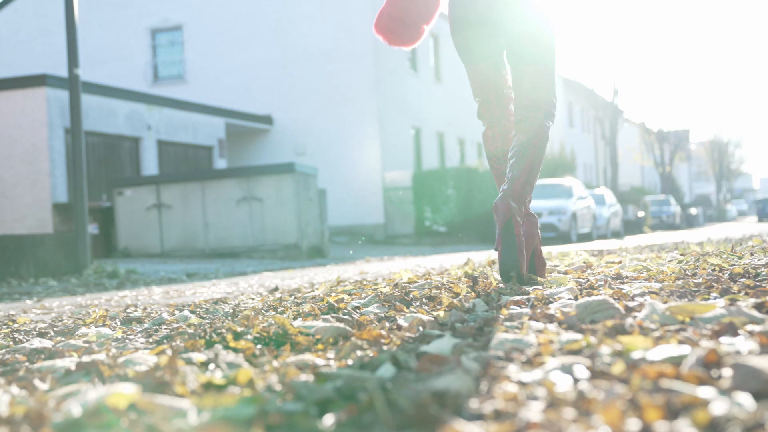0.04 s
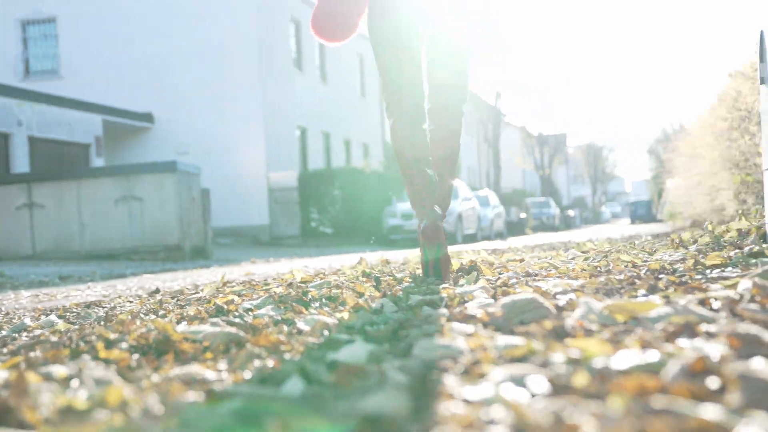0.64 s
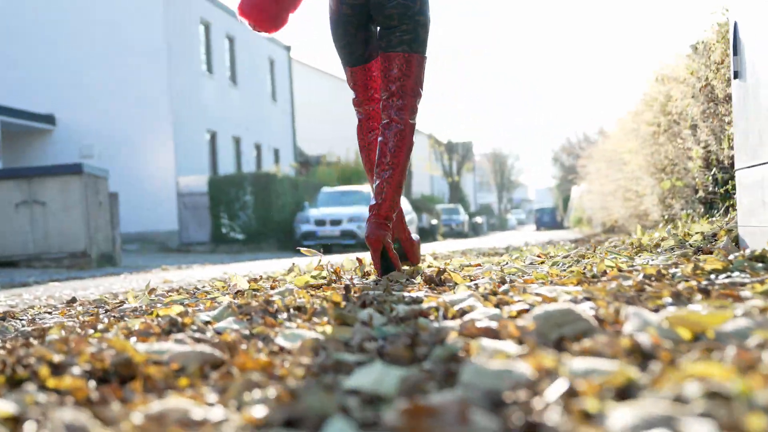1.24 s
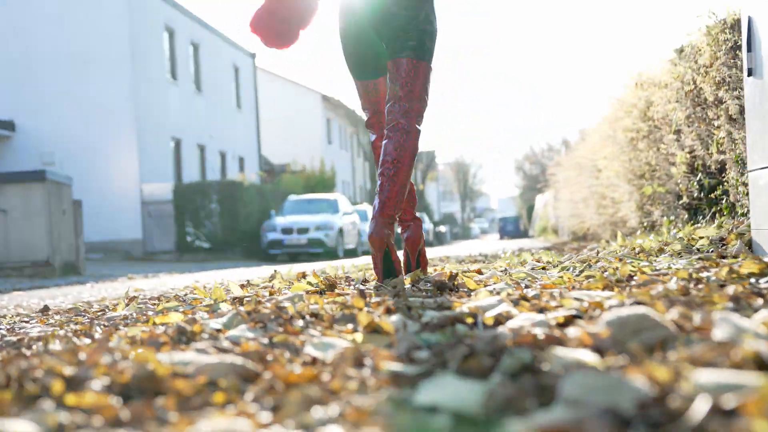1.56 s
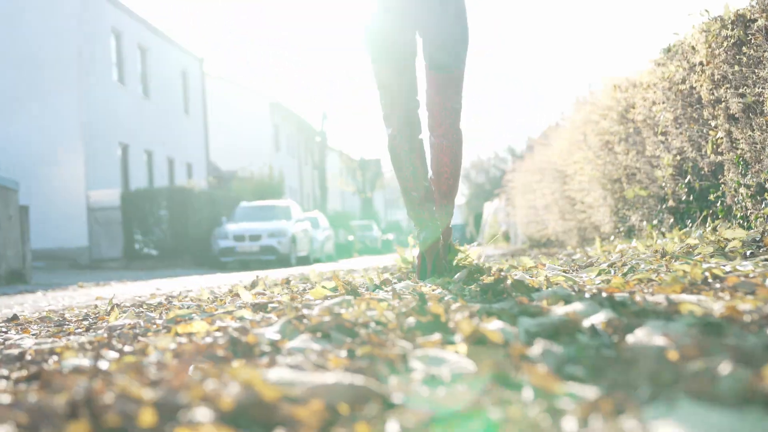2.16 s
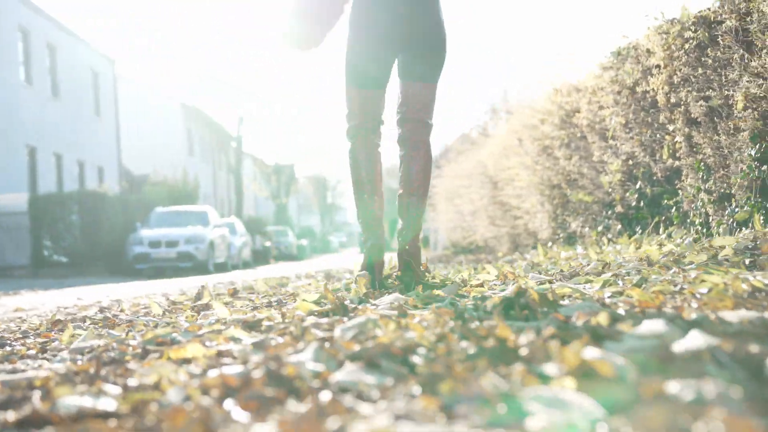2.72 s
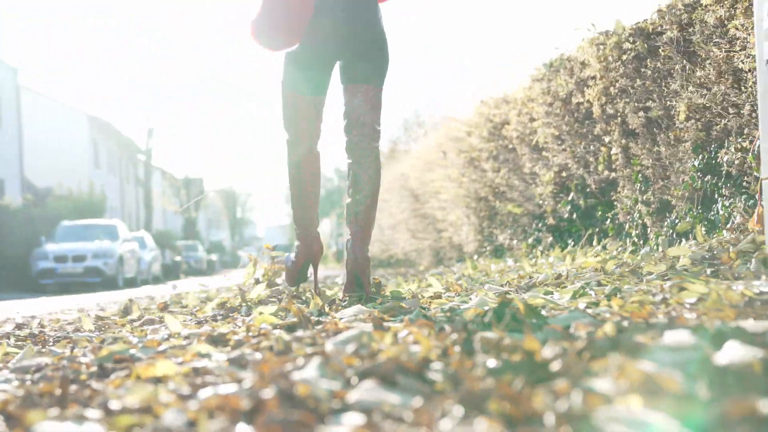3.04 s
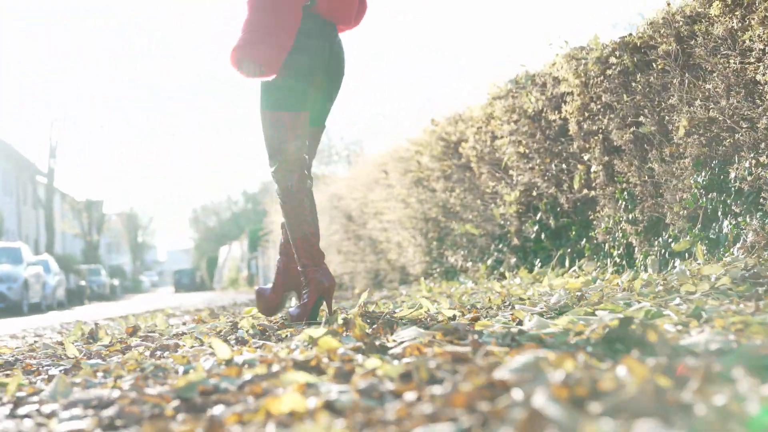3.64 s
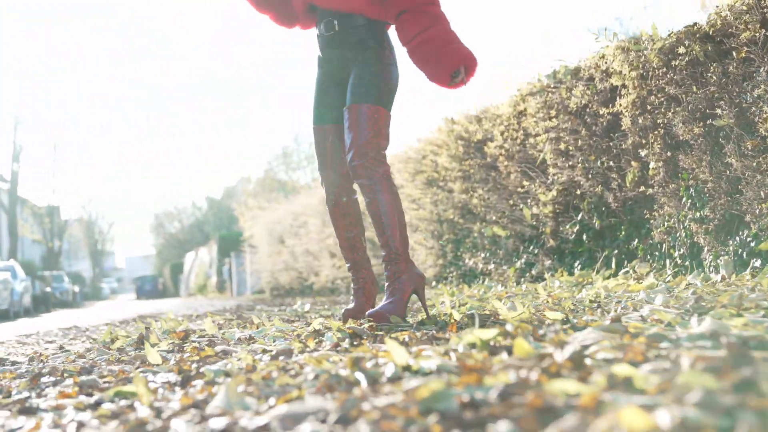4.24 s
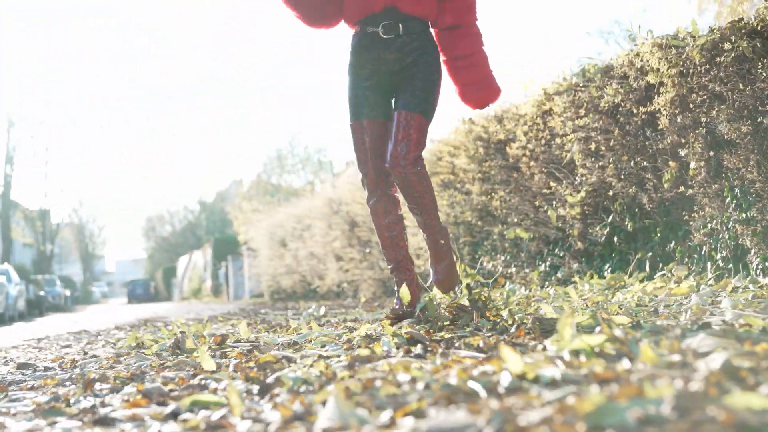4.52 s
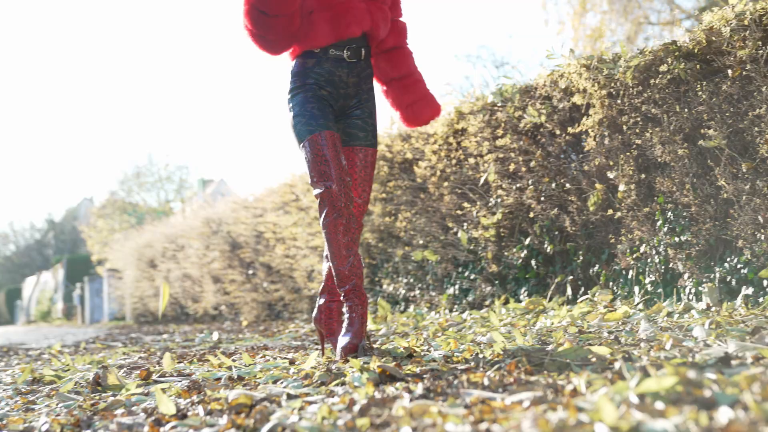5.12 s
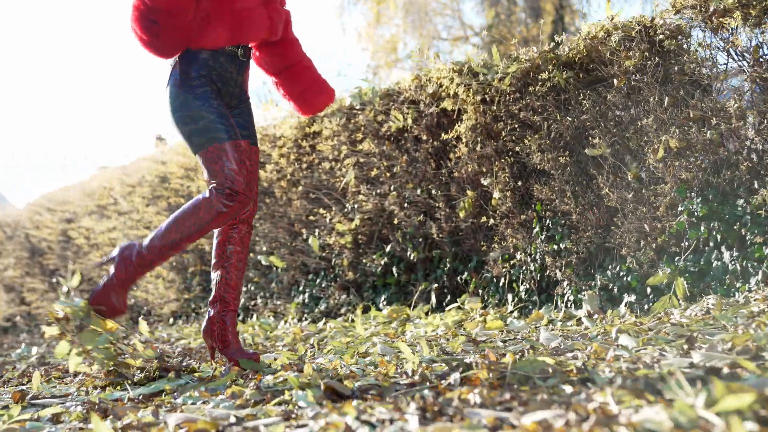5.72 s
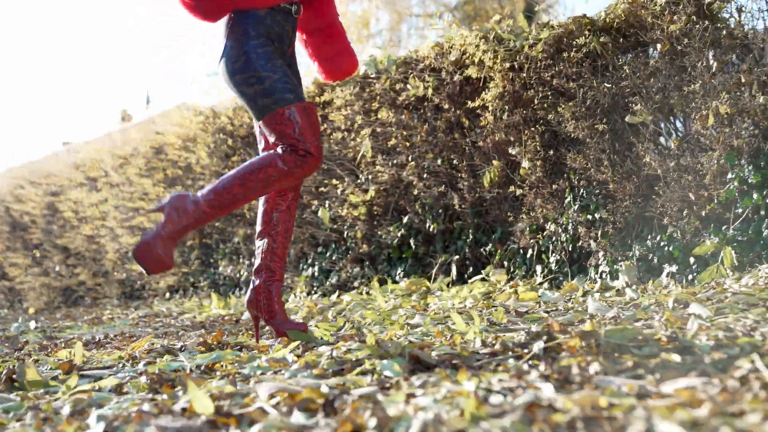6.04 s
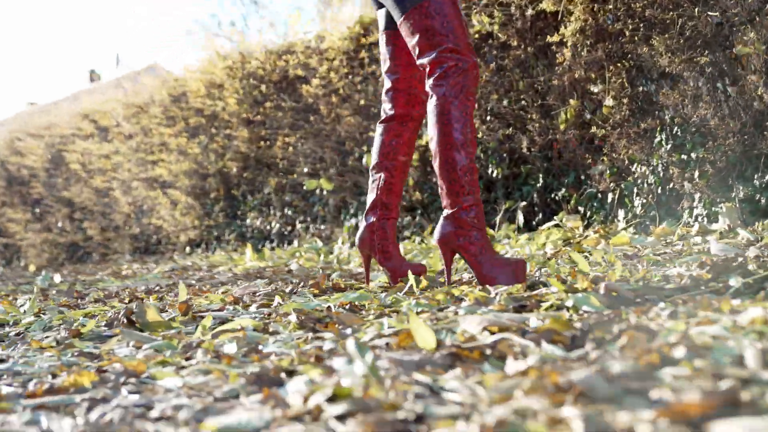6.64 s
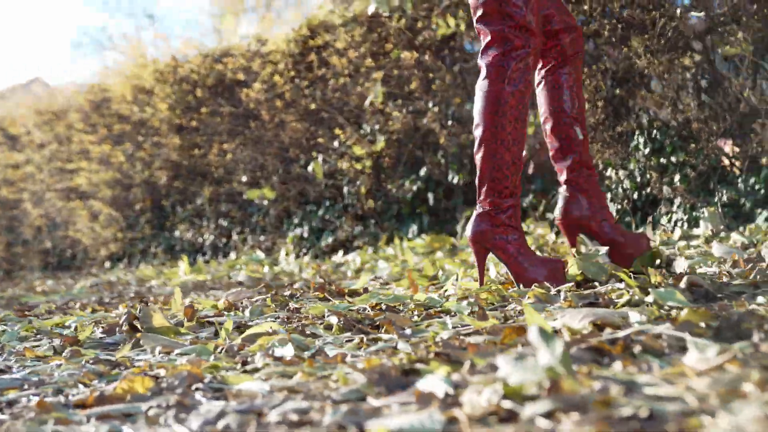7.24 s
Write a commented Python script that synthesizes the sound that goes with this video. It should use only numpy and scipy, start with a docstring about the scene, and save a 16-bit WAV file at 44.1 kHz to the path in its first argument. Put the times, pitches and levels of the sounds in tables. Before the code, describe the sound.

High-heeled boots walk through dry leaves on a pavement, close to a microphone near the ground. The crisp crunching is almost continuous, with sharp stalk snaps, dull sole scuffs and a few soft heel thuds. It starts slightly left, then moves in front and thins to a lighter crackle. Wind buffets the microphone at the start, drops away, and returns stronger in the second half. Distant traffic hums faintly along a residential street.

```python
"""Dry leaves crunch under high-heeled boots on a pavement, close to a microphone near the ground.
Each step or kick breaks a swarm of leaf blades; stalks snap, soles grind, heels thud through the litter.
The boots start on the left and cross in front. Gusts buffet the two microphone ports,
over the faint hum of a residential street."""
import sys
import numpy as np
from scipy import signal
from scipy.fft import rfft, irfft
from scipy.io import wavfile
from scipy.ndimage import uniform_filter1d

SR = 44100
rng = np.random.default_rng(int(sys.argv[2]) if len(sys.argv) > 2 else 0)


def transcribe(u):
    """Save the signal u as a 16-bit wav file named by the first command-line argument.

    u: samples, shape (n,) or (channels, n), limited to [-1, 1]; the rate is SR.
    q: integer samples, one column per channel.
    """
    v = np.clip(np.atleast_2d(u).T, -1, 1)
    q = np.round(v * 32767).astype(np.int16)
    wavfile.write(sys.argv[1], SR, q)


N = 320607
TIME_S = np.arange(N) / SR
FREQ_HZ = np.fft.rfftfreq(N, 1 / SR)
GRID_S = np.arange(0, N / SR, .001)

# treads, kicks, drags: t/s, attack/s, length/s, level/dB, body gain/dB, splinter gain/dB, leaf ring/Hz
STEPS = [(0.029, .025, .05, -35.5, -7.5, 6, 7800), (0.085, .06, 0.103, -30.5, -7.5, 4, 7500),
         (0.205, 0.0335, .115, -34.5, -6.5, 2.5, 6700), (0.515, 0.027, 0.11, -41, -8.5, 1, 5700),
         (0.604, 0.046, .18, -27.5, -9.5, 2, 5386), (0.765, .06, .175, -29, -7.5, 2.5, 5326),
         (0.945, .06, .175, -30, -8.5, 3, 6300), (1.117, 0.025, 0.082, -35, -4.5, 4, 6370),
         (1.197, 0.0205, .065, -27, -8, 2, 6500), (1.29, 0.02124, .075, -30, -8.5, 2.5, 6730),
         (1.375, 0.0186, .055, -36, -1, 1, 5800), (1.434, .01, .21, -26.5, -8.5, 0, 4720),
         (1.635, .04, .215, -32.5, -8, 3, 5740), (1.887, 0.0307, .15, -30.5, -9, 5, 7970),
         (2.031, 0.063, .3, -26.5, -9, 3, 6050), (2.335, 0.0321, .115, -33, -6.5, 9, 6320),
         (2.48, 0.048, .105, -31, -10, 3.5, 6610), (2.581, 0.075, .2, -32.5, -6.5, 5, 7420),
         (2.793, 0.01614, .06, -25.5, -13, -.5, 7180), (2.9, 0.0229, 0.0875, -33.5, -8.5, 3.5, 6670),
         (3.004, 0.078, .1, -26, -10.5, 0.5, 6290), (3.115, .03, .155, -32.5, -7.5, 5.5, 6365),
         (3.275, .03, .075, -35, -6.5, 2.5, 6710), (3.359, 0.0298, .32, -39.5, -6, 2.5, 6165),
         (3.688, 0.047, .115, -25.5, -8, 4, 6700), (3.79, .04, .085, -29.5, -7, 3.5, 6190),
         (3.88, 0.048, .165, -34.5, -7.5, 3, 5295), (3.995, 0.0095, 0.01815, -32, -4.5, -2, 5500),
         (4.04, 0.035, .095, -35, -7.5, 3.5, 7005), (4.135, .045, .075, -30, -5.5, 5, 7590),
         (4.263, 0.027, .085, -27.5, -4, 5, 7670), (4.345, 0.0252, .19, -26, -7, 3, 7000),
         (4.54, .03, .11, -33.5, -7, 2.5, 6450), (4.675, .03, .045, -32.5, -12.5, 3, 6800),
         (4.852, 0.056, .1, -33.5, -5.5, 6.5, 8300), (5.02, .07, .135, -28.5, -7, 2.5, 7060),
         (5.155, .035, .085, -25.5, -11.5, 0.5, 6180), (5.295, 0.0139, 0.0248, -33.5, -7.5, 3, 6250),
         (5.355, 0.023, .11, -39.5, -4.5, 5, 6500), (5.515, 0.054, .11, -35.5, -1, 8, 7300),
         (5.635, 0.011, .14, -39.5, -1, 8.5, 7450), (5.794, .014, .108, -28, -8.5, 6.5, 7700),
         (5.925, 0.023, .21, -40, -2.5, 8.5, 8060), (6.14, 0.1, .2, -38.5, -2, 8.5, 6760),
         (6.345, 0.027, 0.076, -48, 1, 11, 7100), (6.96, 0.054, .2, -44.5, -2, 8.5, 7400),
         (7.18, 0.0514, 0.079, -39.5, -5, 10.5, 8160)]
# leaves stirring on their own: level/dB, body gain/dB, splinter gain/dB, leaf ring/Hz
STIR = (-58, -5, 14.5, 6000)
# leaf colour at the ports: f/Hz, boots left/dB, boots ahead/dB
LEAF_SPECTRUM = [(80, -27, -20), (250, -8, -10), (710, -1.5, 0.5), (1060, 0, 1.5), (2100, -1.5, -4.5),
                 (2600, 5.5, -4.5), (3500, 3, -7.5), (3770, 3.5, -2), (6060, 0.5, 0), (7300, 1.5, 0),
                 (8800, 3, 0.5), (11300, 2, -7), (15500, 4, -4)]
# crunch position: t/s, left minus right/dB
CRUNCH_PAN = [(0.05, 4), (1.9, 4), (3.3, 3.5), (4.2, 2), (5.3, 4), (5.6, -1), (6.4, -0.5), (6.6, -9),
              (7.27, -2)]
# stalks and stiff leaves snapping: t/s, energy/dB, left minus right/dB
SNAPS = [(0.076, 0, 7), (0.2628, 5.5, 0), (0.3177, -16, 13), (0.325, -7, 6), (0.3326, -7, 9),
         (0.378, -2.5, 5), (0.4275, 0, 4), (0.436, 1, 2), (0.4437, -6, 2), (0.45, 2.5, 5), (0.4558, -5, 6),
         (0.4802, -3, 38), (0.488, -6, 9), (0.5317, -4, 9), (0.547, 0, 8), (0.5531, 2, 16), (0.5664, 0, 3),
         (0.5826, -0.5, 6), (0.622, 5, 18), (1.236, 5, -3), (1.886, 4, 6), (2.806, 6, 9), (3.3426, -4, 4),
         (3.6373, -5, 7), (3.649, -3, 14), (3.6768, 0.5, 10), (4.6927, 3.5, 34), (4.702, 8, 0),
         (4.784, -0.5, 4), (4.8401, 0, 4), (5.3829, -1, 7), (5.592, 2, -5), (5.7716, 0, -13),
         (5.8054, -6, -12), (6.063, 1, -12), (6.201, -7, 4.5), (6.388, -12, -9), (6.468, -10, -12),
         (6.855, -2, -6)]
# sole grinding leaves into the paving: t/s, level/dB, duration/s
SCUFFS = [(0.647, -37.5, 0.069), (1.312, -34.5, 0.059), (2.05, -34.5, 0.078), (2.221, -38.5, 0.099),
          (2.85, -34.5, 0.041), (3.757, -35, 0.031), (4.296, -32, 0.034), (4.394, -33, 0.1),
          (5.809, -37, .03)]
# heel and sole impacts: t/s, peak/dB
THUDS = [(2.307, -37), (2.531, -28.5), (2.651, -23), (2.85, -31), (3.139, -31)]
# port response to a source on the left: f/Hz, left lead/rad, coherence/0-1, left minus right/dB
PORT_RESPONSE = [(100.05, -1, 0.2, -17), (676, 1.1, 1, 7.5), (1190, 0, 0, 16), (2000, 3.5, 0.2, 3),
                 (3600, 3.5, 0.71, -3.5), (4740, 5.5, 0.2, -2.5), (6140, 4.5, 0.4, -1.5),
                 (7900, 8, 0.55, -2), (9200, 11, 0, -2), (10700, 7.5, 0.37, 0), (15400, 5, 0, 4)]
# gusts at the microphone: t/s, rise/s, length/s, level/dB
GUSTS = [(0.004, 0.018, 0.022, -26.5), (0.173, 0.038, 0.082, -23.5), (0.271, .02, 0.038, -27),
         (0.385, 0.026, 0.15, -26.5), (0.506, 0.041, 0.1, -26), (0.67, 0.02, 0.23, -27.5),
         (0.85, 0.076, .25, -25.5), (1.205, 0.028, .08, -33), (1.302, 0.035, 0.15, -33),
         (4.336, 0.041, 0.19, -33.5), (4.584, 0.063, 0.1, -24), (4.735, 0.029, 0.13, -28),
         (4.869, 0.038, 0.13, -26), (5.019, 0.024, 0.32, -24), (5.355, 0.029, 0.078, -27.5),
         (5.504, 0.022, 0.077, -30), (5.625, 0.062, 0.15, -36), (5.784, 0.027, .11, -30),
         (5.975, 0.043, .075, -22), (6.11, 0.028, 0.19, -28.5), (6.234, 0.054, 0.11, -21),
         (6.439, 0.016, 0.11, -22.5), (6.553, 0.038, 0.096, -19), (6.727, 0.053, 0.14, -19.5),
         (6.877, 0.042, 0.1, -22), (7.057, 0.024, 0.055, -25), (7.173, 0.043, 0.11, -18.5)]
# single eddies slapping the microphone: t/s, boost/dB
EDDY_SLAPS = [(0.226, 13), (0.409, 9), (0.949, 11.5), (4.674, 7), (4.921, 7), (5.129, 8), (5.323, 10),
              (6.046, 9.5), (6.449, 17), (6.595, 7.5), (6.623, 6), (6.797, 14), (7.081, 12)]
# choppiness of the air: t/s, small-eddy gain/dB
CHOP = [(0.3, -4.5), (1.2, -0.5), (4.6, 6.5), (5.3, 6), (6.0, -10.5), (6.6, 5), (7.2, -0.5)]
# eddies drifting from the windward port to the other: f/Hz, lag/rad, coherence/0-1
EDDY_DRIFT = [(20, .25, 0.1), (86, 0.37, 1), (170, 0.86, 0.75), (343, 1.45, 0.85), (640, 2, 0.71),
              (2000, 1.16, 0.95)]
# wind buffeting: f/Hz, level/dB
WIND_SPECTRUM = [(25, -9), (50, -3), (90, 4), (170, 3.5), (300, -3), (500, -10), (800, -21), (1200, -31),
                 (2000, -46), (3500, -78)]
# far traffic: f/Hz, level/dB
TRAFFIC_SPECTRUM = [(25, -15), (60, -3.5), (110, -10), (180, -10.5), (400, -16.5), (1000, -15.5),
                    (2000, -25.5), (6000, -21.5), (15000, -25.5)]

LIFT_S = 0.033  # the boot's weight lets go
SETTLE_DB, SETTLE_S = -17, .2  # disturbed leaves crackle on
UNEVEN_DB, UNEVEN_HZ = 0.8, 59.93  # the litter gives way in fits
GUST_FALL_S, LULL_DB, FLUTTER_DB = 0.072, -47.5, 2.3
TOP_HZ = 15800


def leaf_crunch(leftness):
    """Fractures over a rub of blade on blade, mixed as body, crisp and splinter bands."""
    step_db, body_db, splinter_db, ring_hz = step_curves()
    crunch_db = step_db + UNEVEN_DB * jitter(UNEVEN_HZ)
    swarm = fracture_swarm(crunch_db, ring_hz)
    rub = undb(2.5 + 1.1 * jitter(70)) * rng.standard_normal((2, N))
    sound = mic_ports(ground_echo(swarm + rub), leftness)
    left_db, ahead_db = per_bin(LEAF_SPECTRUM)
    sound = leftness * filtered(sound, undb(left_db)) + (1 - leftness) * filtered(sound, undb(ahead_db))
    below_crisp, below_splinters = lowpass(3500, order=12), lowpass(8500, order=12)
    body = unit_rms(filtered(sound, below_crisp)) * undb(body_db)
    crisp = unit_rms(filtered(sound, below_splinters - below_crisp)) * undb(-0.56)
    splinters = unit_rms(filtered(sound, (1 - below_splinters) * (FREQ_HZ < TOP_HZ)))
    bands = body + crisp + splinters * undb(splinter_db - 3)
    return bands * undb(crunch_db) * pan(per_sample(CRUNCH_PAN)[0])


def step_curves():
    """Steps add in energy and weight the colour by their share: level/dB, body/dB, splinters/dB, ring/Hz."""
    starts_s, attacks_s, lengths_s, level_db, *colours = np.transpose(STEPS)
    stir_db, *stir_colours = STIR
    press = envelopes(starts_s, lengths_s, attacks_s, LIFT_S)
    settle = undb(SETTLE_DB) * envelopes(starts_s, lengths_s, attacks_s, SETTLE_S)
    step_energy = undb(level_db)[:, None] ** 2 * (press ** 2 + settle ** 2)
    energy = np.vstack([step_energy, np.full(len(GRID_S), undb(stir_db) ** 2)])
    total = energy.sum(axis=0)
    colour = np.column_stack([colours, stir_colours]) @ energy / total
    return per_sample(np.column_stack([GRID_S, 10 * np.log10(total), *colour]))


def fracture_swarm(crunch_db, ring_hz, count=14000):
    """A harder step breaks more leaves; they share its weight, so the swarm is levelled."""
    when, luck, size, side = rng.random((count, 4)).T
    at_s = when * TIME_S[-1]
    break_chance = np.clip(undb(.9 * (crunch_db + 25)), .04, 1)
    breaks = luck < np.interp(at_s, TIME_S, break_chance)
    at_s, size, side = at_s[breaks], size[breaks], side[breaks]
    gains = undb(np.minimum(-4.5 * np.log(size), 9)) * pan(8 * (side - .5))
    grains = cracks(np.interp(at_s, TIME_S, ring_hz), ring_db=7, decay_s=0.00043, spread=0.26,
                    tail_db=-10.5, tail_s=0.011)
    swarm = place(at_s, grains * gains[..., None])
    power = uniform_filter1d(np.mean(swarm ** 2, axis=0), size=1800).clip(0)
    return swarm / np.sqrt(power + 1e-6)


def cracks(ring_hz, ring_db, decay_s, spread, tail_db, tail_s, samples=384):
    """Unit-energy brittle fractures: each rings its scrap of leaf and scatters in the litter."""
    t = np.arange(samples) / SR
    stretch, detune = rng.standard_normal((len(ring_hz), 2)).T[:, :, None]
    fracture = np.exp(-t / (decay_s * np.exp(spread * stretch)))
    scatter = undb(tail_db) * np.exp(-t / tail_s) * (1 - t / t[-1])
    burst = rng.standard_normal((2, len(ring_hz), samples)) * (fracture + scatter)
    ratio = (np.fft.rfftfreq(2 * samples, 1 / SR) + 1) / (ring_hz[:, None] * np.exp(.2 * detune))
    resonance = 1 + undb(ring_db) / (1 + 3j * (ratio - 1 / ratio))
    sound = irfft(rfft(burst, 2 * samples) * resonance)[..., :samples]
    energy = np.sum(sound ** 2, axis=-1, keepdims=True)
    return sound / np.sqrt(energy.mean(axis=0))


def stalk_snaps(leftness):
    """Stalks give way with a bright tick, fibres tearing for about 1 ms."""
    at_s, energy_db, pan_db = np.transpose(SNAPS)
    ticks = cracks(np.full(len(at_s), 5200.), ring_db=-1, decay_s=.0012, spread=.1,
                   tail_db=-28, tail_s=.004)
    sound = place(at_s, ticks * (undb(energy_db) * pan(pan_db))[..., None])
    return filtered(mic_ports(sound, leftness), 1 - .7 * lowpass(3500, order=6))


def sole_scuffs(leftness):
    """Crushed leaves slip in small, dull jerks between sole and paving."""
    press = sum(undb(db) * bump(at_s, length_s / 2) for at_s, db, length_s in SCUFFS)
    jerks = rng.standard_normal((2, N)) * undb(1.9 * jitter(300))
    band = lowpass(910, order=4) * (1 - lowpass(930, order=3))
    return press * unit_rms(filtered(mic_ports(jerks, leftness), band))


def heel_thuds(partials=30):
    """Heel and sole land on padded paving: a few low, quickly damped swings."""
    at_s, peak_db = np.transpose(THUDS)
    t = np.arange(SR // 8) / SR
    hz = 70 + 210 * rng.random((len(at_s), partials, 1))
    swing = np.sin(2 * np.pi * (hz * t + rng.random(hz.shape))).sum(axis=1)
    swing = swing * (1 - np.exp(-t / 0.0045)) * np.exp(-t / 0.014)
    swing = swing / np.abs(swing).max(axis=1, keepdims=True) * undb(peak_db)[:, None]
    return place(at_s, np.array([swing, swing]))


def ground_echo(x, lag_s=0.000583, wander=0.24, gain=0.32):
    """Early echo off boot and ground; its path wanders as the feet move, shifting the colour."""
    echo = [np.interp(TIME_S - lag_s * np.exp(wander * jitter(6)), TIME_S, side) for side in x]
    return x + gain * np.array(echo)


def mic_ports(x, leftness):
    """From the left, sound reaches the right port late and shaded; from ahead only bass is coherent."""
    lead_rad, coherence, shade_db = per_bin(PORT_RESPONSE)
    sideways = filtered(coherent_pair(x, np.clip(coherence, 0, .98), lead_rad), pan(shade_db))
    ahead = coherent_pair(x, lowpass(1260, order=2), lag_rad=0)
    return leftness * sideways + (1 - leftness) * ahead


def wind_buffet():
    """Eddies shake one port, then the other; strong gusts add small eddies that flutter higher up."""
    gust_db = gust_level_db()
    slap_db = sum(db * bump(at_s, 0.0027) for at_s, db in EDDY_SLAPS)
    push_db = gust_db + slap_db + 1.73 * jitter(45)
    lag_rad, coherence = per_bin(EDDY_DRIFT)
    air = coherent_pair(rng.standard_normal((2, N)), np.clip(coherence, 0, .995), lag_rad)
    veer_rad = np.interp(TIME_S, [1.6, 4.3], [0, np.pi / 2])  # from the right, later from the left
    air = np.cos(veer_rad) * air[::-1] + np.sin(veer_rad) * air
    air = filtered(air, undb(per_bin(WIND_SPECTRUM)[0]) * (1 - lowpass(25, order=4)))
    air = air / np.sqrt(uniform_filter1d(air.mean(axis=0) ** 2, size=1500))  # the gust sets the energy
    large = filtered(air, lowpass(244, order=4))
    medium = filtered(air, lowpass(300, order=4)) - large
    small = air - large - medium
    strength = np.clip(undb(.5 * (push_db + 21.5)), .2, 1)
    flutter = strength * medium + strength ** 2 * small * undb(FLUTTER_DB * jitter(110))
    lull_gain = 1 / (1 + undb(2 * (-50.5 - gust_db)))
    return (large + flutter * undb(per_sample(CHOP)[0])) * undb(push_db - 1.5) * lull_gain


def gust_level_db():
    """Gusts rise, hold and die away over a light breeze."""
    starts_s, rises_s, lengths_s, level_db = np.transpose(GUSTS)
    gusts = undb(level_db)[:, None] * envelopes(starts_s, lengths_s, rises_s, GUST_FALL_S)
    energy = np.sum(gusts ** 2, axis=0) + undb(LULL_DB) ** 2
    return np.interp(TIME_S, GRID_S, 10 * np.log10(energy))


def street_hum():
    """Far traffic murmurs evenly; a 110 Hz engine drone grows in it."""
    mid, side, engine = rng.standard_normal((3, N))
    noise = mid + np.array([[1], [-1]]) * filtered(side, 1 - 0.7 * lowpass(1100, order=2))
    traffic = unit_rms(filtered(noise, undb(per_bin(TRAFFIC_SPECTRUM)[0])))
    drone = unit_rms(filtered(engine, np.exp(-((FREQ_HZ - 110) / 4) ** 2)))
    drone_db = np.interp(TIME_S, [2.8, 3.6, 4.4, 6], [-59, -48.5, -47.5, -43])
    return traffic * undb(-41.5 + jitter(4) / 2) + drone * undb(drone_db)


def coherent_pair(x, coherence, lag_rad):
    """Left is x[0]; right blends a lagged copy of it with x[1]."""
    shared = filtered(x[0], coherence * np.exp(-1j * lag_rad))
    own = filtered(x[1], np.sqrt(1 - coherence ** 2))
    return np.array([x[0], shared + own])


def envelopes(starts_s, lengths_s, attacks_s, release_s):
    """Attack, hold, release on the 1 ms grid, one row an event."""
    t = GRID_S[:, None] - starts_s
    return (np.clip(t / attacks_s, 0, 1) * np.exp(-np.maximum(t - lengths_s, 0) / release_s)).T


def bump(at_s, half_width_s):
    """Gaussian pulse, peak 1."""
    return np.exp(-((TIME_S - at_s) / half_width_s) ** 2)


def jitter(rate_hz):
    """Smoothed random steps, spread 1."""
    hold = int(SR / rate_hz)
    stairs = np.repeat(rng.standard_normal(N // hold + 1), hold)
    return unit_rms(uniform_filter1d(stairs, hold)[:N])


def place(at_s, sounds):
    """Sum short sounds (channel, event, sample) at their times."""
    index = (np.maximum(at_s, 0) * SR).astype(int)[:, None] + np.arange(sounds.shape[-1])
    return np.array([np.bincount(index.ravel(), side.ravel(), N)[:N] for side in sounds])


def per_sample(table):
    """Interpolate the columns of a time table."""
    at_s, *columns = np.transpose(table)
    return [np.interp(TIME_S, at_s, column) for column in columns]


def per_bin(table):
    """Interpolate the columns of a frequency table."""
    hz, *columns = np.transpose(table)
    return [np.interp(np.log(FREQ_HZ + 1), np.log(hz), column) for column in columns]


def lowpass(hz, order):
    """Low-pass gain per bin."""
    return 1 / (1 + (FREQ_HZ / hz) ** order)


def filtered(x, gain):
    """Apply a gain per bin."""
    return irfft(rfft(x) * gain, N)


def unit_rms(x):
    """Scale the channel mean to rms 1."""
    return x / np.std(np.atleast_2d(x).mean(axis=0))


def pan(db):
    """Constant-power gains for a left minus right level."""
    gains = undb(np.array([db, -db]) / 2)
    return gains / np.sqrt(np.mean(gains ** 2, axis=0))


def undb(db):
    """Decibels to gain."""
    return 10 ** (np.asarray(db) / 20)


def scene():
    """Boots move from the left to the front, over wind and street."""
    leftness = np.interp(TIME_S, [5.3, 5.8], [1, .1])
    boots = leaf_crunch(leftness) + stalk_snaps(leftness) + sole_scuffs(leftness) + heel_thuds()
    return boots + wind_buffet() + street_hum()


def record(dry):
    """Open at 45 ms, round the peaks, cut the top."""
    fade_in = np.clip((TIME_S - 0.045) * SR / 64, 0, 1)
    rounded = .8 * np.tanh(dry * fade_in / .8)
    return signal.sosfilt(signal.ellip(10, .2, 70, TOP_HZ, fs=SR, output="sos"), rounded)


dry = scene()
out = record(dry)
transcribe(out)
```